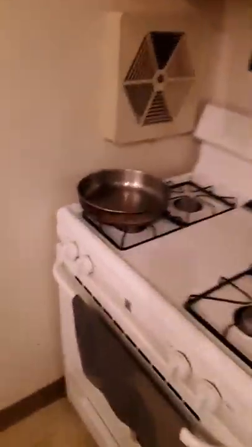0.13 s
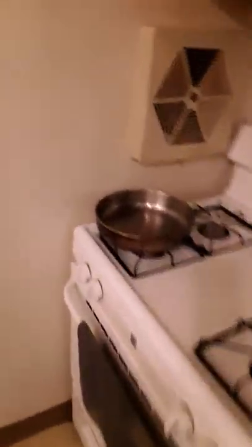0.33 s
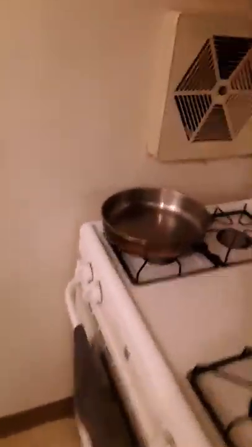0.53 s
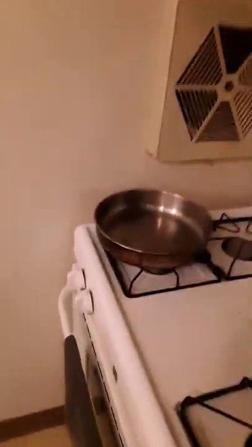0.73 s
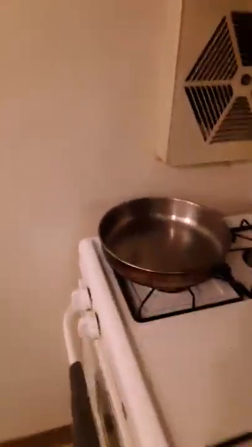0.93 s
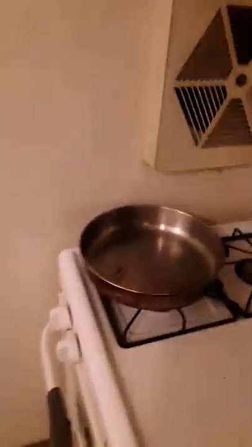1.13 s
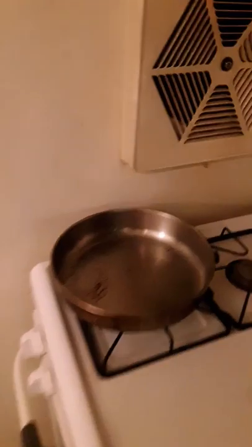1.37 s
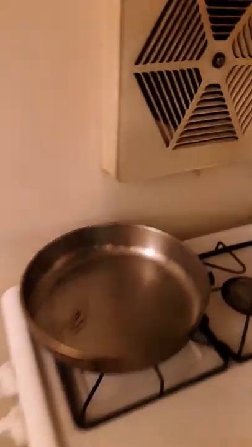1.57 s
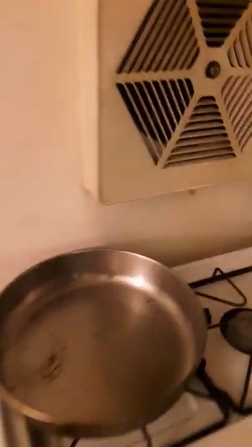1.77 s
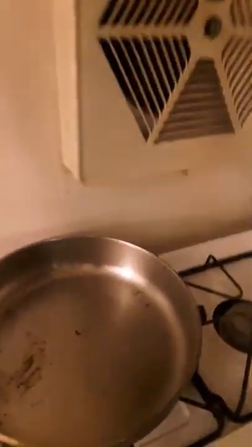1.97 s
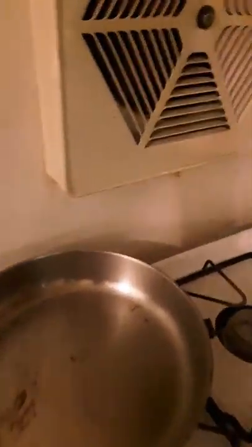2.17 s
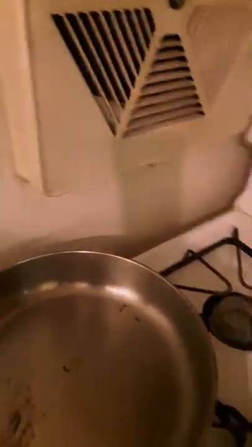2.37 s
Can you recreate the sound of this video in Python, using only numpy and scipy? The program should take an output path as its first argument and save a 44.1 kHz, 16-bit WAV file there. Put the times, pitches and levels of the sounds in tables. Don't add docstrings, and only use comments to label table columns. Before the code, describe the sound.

Slippers shuffle on a gritty hard floor in a small ringing kitchen, heard from a handheld phone. A drag fades at the start; soles land near 0.14, 0.77, 1.43 and 1.95 s, with raspy skids, soft thuds and lighter brushes between. The fourth slap is the loudest, sharpest crack. A faint drag ends it near 2.4 s. Quiet room rumble, hiss and a low appliance hum swell and sink throughout.

```python
import sys
import numpy as np
from scipy import signal
from scipy.io import wavfile
from scipy.ndimage import uniform_filter1d

SR = 44100
rng = np.random.default_rng(int(sys.argv[2]) if len(sys.argv) > 2 else 0)


def int16_out(signal):
    q = np.round(np.clip(np.atleast_2d(signal).T, -1, 1) * 32767)
    wavfile.write(sys.argv[1], SR, q.astype(np.int16))


def voltage_ratio(level):
    return 10 ** (np.asarray(level, float) / 20)


N = 110250
PAD = 8820


def evened(x):
    return x / np.sqrt(np.mean(x ** 2) + 1e-20)


def smoothed_twice(x, size):
    return uniform_filter1d(uniform_filter1d(x, size=size), size=size)


def read(points, hz):
    f, value = np.transpose(points)
    return np.interp(np.log(hz + 1), np.log(f + 1), value)


def colour(x, db_at):
    hz = abs(np.fft.fftfreq(4096, 1 / SR))
    log_gain = np.log(voltage_ratio(np.maximum(db_at(hz), -100)))
    phase = -signal.hilbert(log_gain).imag
    taps = np.fft.ifft(np.exp(log_gain + 1j * phase)).real[:2048]
    return signal.oaconvolve(x, taps)[:len(x)]


def resonate(x, hz, width):
    b, a = signal.iirpeak(hz, hz / width, SR)
    return signal.lfilter(b, a, signal.lfilter(b, a, x))


def add(mix, s, sound):
    part = mix[PAD + round(s * SR):][:len(sound)]
    part += sound[:len(part)]


# pitch_hz, likeness [0 to 1]
PORT_LIKENESS = [(60, .91), (330, .88), (700, .4), (1400, .02)]


def paired(z, hz):
    same = np.clip(read(PORT_LIKENESS, hz), -1, 1)[:, None]
    return np.array([z[0], same * z[0] + np.sqrt(1 - same ** 2) * z[1]])


# pitch_hz, level_db [per Hz]
ROOM_TONE = [(15, -31), (25, -10.5), (123, -1), (223, -3.5), (293, -13.5), (326, -10.5), (659, -20),
             (1940, -16.5), (16000, -26)]
ROOM_TONE_DB, PATCH_DB = -66, .6


def air():
    frames, hz = N // 256 + 5, np.fft.rfftfreq(1024, 1 / SR)
    a, b, patches = rng.standard_normal((frames, 513, 2, 3)).T
    patches = uniform_filter1d(patches[0], size=8, axis=0)
    patches = evened(uniform_filter1d(patches, size=14, axis=1))
    z = paired(a + 1j * b, hz) * voltage_ratio(read(ROOM_TONE, hz)[:, None] + PATCH_DB * patches)
    noise = signal.istft(z, nperseg=1024, noverlap=768)[1][:, :N]
    return voltage_ratio(ROOM_TONE_DB) * evened(noise)


# time_s, level_db
HUM_NEARNESS = [(0.0, -78), (0.38, -66), (0.73, -104), (1.04, -63), (1.1, -75.5), (1.64, -59), (2.46, -61),
                (2.5, -71)]
# pitch_hz, level_db
MAINS_TONES = [(60, -16.5), (120, -4), (183, -12)]
# time_s, level_db
MOTOR_DRONE = [(0, -97), (.55, -80), (.62, -66.5), (.72, -87), (.8, -61), (.95, -75), (1.1, -82),
               (2.5, -70)]
DRONE_HZ = 213


def hum():
    t = np.arange(N) / SR
    waver = [evened(smoothed_twice(rng.standard_normal(N), 2500)) for _ in range(4)]
    mains = np.zeros(N)
    for (hz, db), w in zip(MAINS_TONES, waver):
        mains += voltage_ratio(db + 0.83 * w) * np.sin(2 * np.pi * hz * t + .4 * w)
    mains *= voltage_ratio(np.interp(t, *np.transpose(HUM_NEARNESS)))
    drone = np.sin(2 * np.pi * DRONE_HZ * t + 0.2 * waver[3])
    drone *= voltage_ratio(np.interp(t, *np.transpose(MOTOR_DRONE)))
    return np.sqrt(2) * (mains + drone)


# pitch_hz, t60_s
RING_TIME = [(250, 0.57), (660, .4), (1740, 0.43), (4590, 0.34), (9000, 0.39), (15000, 0.18)]
NEAR_DB, NEAR_S = 8, .012


def reflections():
    taps = np.zeros((2, SR // 2))
    at = np.arange(20, SR // 2 - 10, 10) + rng.integers(0, 10, (2, (SR // 2 - 21) // 10))
    np.put_along_axis(taps, at, rng.choice([-1., 1.], at.shape), 1)
    hz, t, z = signal.stft(taps, SR, nperseg=256)
    decay = voltage_ratio(-60 * t / read(RING_TIME, hz)[:, None])
    tail = signal.istft(paired(z, hz) * decay, SR, nperseg=256)[1]
    tail *= voltage_ratio(NEAR_DB * np.exp(-np.arange(tail.shape[1]) / SR / NEAR_S))
    tail[:, :20] = 0
    return tail / np.linalg.norm(tail, axis=1)[:, None]


WALK_S = .012
LEFT_LAG = 17


def kitchen(x, wet_db, count):
    spot = np.arange(len(x)) / SR / WALK_S
    wet = np.zeros(2)[:, None]
    for k in range(count):
        share = np.cos(np.pi / 2 * np.clip((spot - k) % count - 1, -1, 1))
        wet = wet + signal.fftconvolve((x * share)[None], reflections(), axes=1)
    direct = np.array([x[PAD - LEFT_LAG:PAD - LEFT_LAG + N], x[PAD:]])
    return voltage_ratio(-3) * (direct + voltage_ratio(wet_db) * wet[:, PAD:PAD + N])


# start_s, level_db, pitch_hz, swell_s
WEIGHT_THUDS = [(-.03, -53, 1240, 0.02), (2.27, -73, 268, 0.065), (0.161, -61, 220, 0.012),
                (.29, -51.5, 864, 0.017), (0.318, -56.5, 302, 0.01), (0.332, -56.5, 117, 0.0067),
                (.77, -56.5, 700, 0.016), (.78, -62, 388, 0.0088), (.97, -52.5, 900, 0.011),
                (1.021, -63, 96, 0.018), (1.12, -72, 89, 0.013), (1.2, -62, 710, 0.008),
                (1.432, -49, 860, 0.01), (1.439, -53.5, 343, 0.01), (1.439, -55, 204, 0.018),
                (1.588, -48.5, 916, 0.017), (1.63, -56.5, 113, 0.019), (1.948, -47.5, 180, 0.0078),
                (1.959, -56, 118, 0.019), (1.959, -57, 396, 0.021), (1.98, -50, 890, 0.012),
                (2.149, -51, 880, 0.016), (2.151, -60, 402, 0.018), (1.66, -66.5, 313, 0.067),
                (1.13, -58.5, 1350, 0.057), (.8, -71.5, 112, 0.032), (1.681, -69, 65, 0.042)]
THUD_FADE, THUD_WIDTH = 1.32, .45


def thuds():
    out, t = np.zeros(N + PAD), np.arange(6000) / SR
    for s, db, hz, swell in WEIGHT_THUDS:
        push = t / swell * np.exp(1 - (t / swell) ** THUD_FADE)
        body = resonate(rng.standard_normal(6000), hz, THUD_WIDTH * hz) * push
        loudness = np.sqrt(np.sum(body ** 2) / np.sum(push ** 2))
        add(out, s, voltage_ratio(db) * body / loudness)
    return out


# start_s, level_db [peak], pitch_hz
EDGE_SLAPS = [
    (.7688, -22, 1900),
    (.8335, -20, 2500),
    (1.4345, -18, 2600),
    (1.951, -9, 4400),
    (1.956, -13, 3700),
    (.192, -19, 3200),
    (.251, -16, 5500),
    (.776, -22, 6000),
    (.8155, -25, 1900),
]
SLAP_S, SLAP_WIDTH = .0007, .5


def slaps():
    out, t = np.zeros(N + PAD), np.arange(600) / SR
    for s, db, hz in EDGE_SLAPS:
        burst = rng.standard_normal(600) * np.exp(-t / SLAP_S)
        crack = resonate(burst, hz, SLAP_WIDTH * hz)
        add(out, s, voltage_ratio(db) * crack / abs(crack).max())
    return out


# pitch_hz, level_db [per Hz]
GRIT_COLOUR = [(180, -60), (300, -38.5), (946, -18), (1040, -17.5), (1900, -3), (2480, -4.5), (3830, -2),
               (11700, -13.5), (16000, -25.5)]
GRIT_PER_S, GRIT_SPREAD_DB, FINE_SHARE = 4000, 3.8, .55


def gritty_floor():
    n = N + PAD
    grit = voltage_ratio(GRIT_SPREAD_DB * np.minimum(rng.exponential(1, n), 4))
    grit *= rng.random(n) < GRIT_PER_S / SR
    grit *= rng.choice([-1., 1.], n)
    rub = (1 - FINE_SHARE) * evened(grit) + FINE_SHARE * rng.standard_normal(n)
    rub = evened(colour(rub, lambda hz: read(GRIT_COLOUR, hz)))
    top = colour(rub, lambda hz: read([(830, -20), (9300, 0)], hz))
    return rub - top, top


# start_s [full speed reached], rise_s, hold_s, level_db [pressure], brightness_db
DRAGS = [(-.08, 0.026, 0.059, -48, 4), (0.149, 0.019, 0.063, -34, -16), (0.205, 0.02, 0.029, -29, -2.5),
         (0.245, 0.034, 0.027, -27.5, -2.5), (0.525, 0.13, 0.011, -57, 0), (0.765, 0.025, .1, -39, -4),
         (0.897, 0.024, 0.048, -33.5, 2), (1.143, 0.035, 0.017, -45.5, -30), (1.209, 0.059, 0.013, -49, -2),
         (1.454, 0.0087, 0.025, -38, -21), (1.491, 0.046, .03, -33, -6), (1.554, 0.037, 0.038, -31, -5.5),
         (1.807, 0.068, 0.012, -45, -1.5), (1.968, .02, 0.028, -33, -19), (2.017, 0.036, .04, -40.5, -14),
         (2.136, 0.047, 0.0054, -36.5, -18), (2.151, 0.026, 0.0087, -43, 1.5),
         (2.378, 0.047, 0.045, -61, -14)]
TOUCHDOWN_S = [
    .1372,
    .7683,
    1.4313,
    1.9500,
]
# level_db, brightness_db, fade_s
TOUCHDOWN_SKIDS = [
    (-31.5, -1, .008),
    (-29, -2.5, 0.0053),
    (-26, -9.5, 0.0088),
    (-23.5, -25, .012),
]
LIFT_S, AIRBORNE_S = .02, .05


def scuffs():
    t = (np.arange(N + PAD) - PAD) / SR
    body, edge = np.zeros((2, N + PAD))
    for s, rise, hold, db, bright_db in DRAGS:
        press = np.cos(np.pi / 2 * np.clip((t - s) / rise, -1, 0)) ** 2
        press *= np.exp(-(np.maximum(t - s - hold, 0) / LIFT_S) ** 2)
        body += (voltage_ratio(db) * press) ** 2
        edge += (voltage_ratio(db + bright_db) * press) ** 2
    for s, (db, bright_db, fade) in zip(TOUCHDOWN_S, TOUCHDOWN_SKIDS):
        contact = (t < s - AIRBORNE_S) | (t >= s)
        skid = (t >= s) * np.exp(-abs(t - s) / fade)
        body = body * contact + (voltage_ratio(db) * skid) ** 2
        edge = edge * contact + (voltage_ratio(db + bright_db) * skid) ** 2
    body, edge = uniform_filter1d(np.sqrt([body, edge]), size=30, axis=1)
    dull, bright = gritty_floor()
    return body * dull + edge * bright


ROOM_DB, SLAP_WET_DB = 5.5, -11


def scene():
    soles = kitchen(scuffs() + thuds(), ROOM_DB, count=7)
    cracks = kitchen(slaps(), ROOM_DB + SLAP_WET_DB, count=2)
    return soles + cracks + air() + hum()


# pitch_hz, level_db
PORT_CAVITY = [(1300, -1), (1600, -1), (1900, 3), (2300, 0.5), (3000, 2)]
# pitch_hz, level_db [left minus right]
PORT_DIFFERENCE = [(60, .5), (400, .5), (1000, -.4), (4400, -1), (8000, -4.5), (15000, -5.5)]


def microphone(dry):
    ports = []
    for x, side in zip(dry, (1, -1)):
        ports.append(colour(x, lambda hz: read(PORT_CAVITY, hz) + side * read(PORT_DIFFERENCE, hz) / 2))
    low_pass = signal.firwin(511, 15800, window=("kaiser", 9), fs=SR)
    return signal.oaconvolve(np.array(ports), low_pass[None], "same")


def top_cut(x):
    return signal.sosfilt(signal.butter(12, 16460, fs=SR, output="sos"), x)


def record(dry):
    mix = microphone(dry)
    return top_cut(mix)


dry = scene()
out = record(dry)
int16_out(out)
```